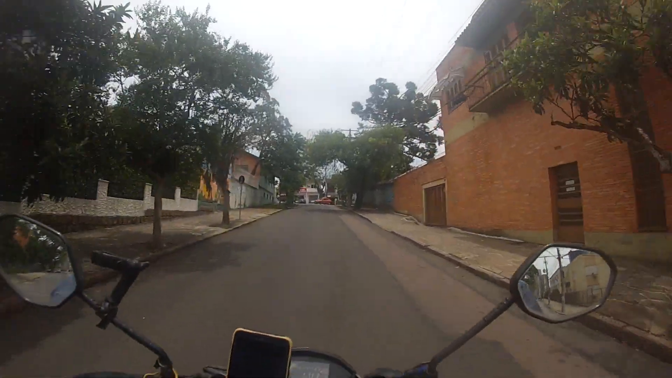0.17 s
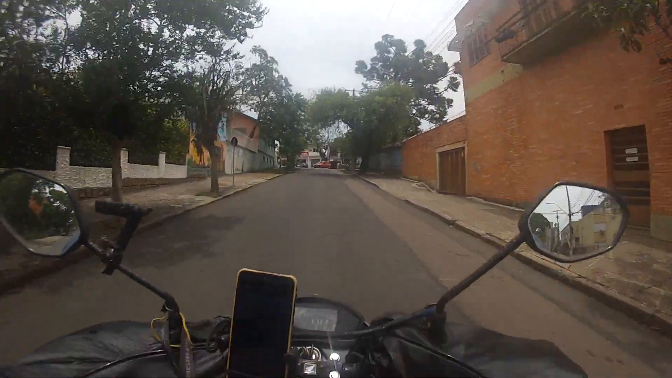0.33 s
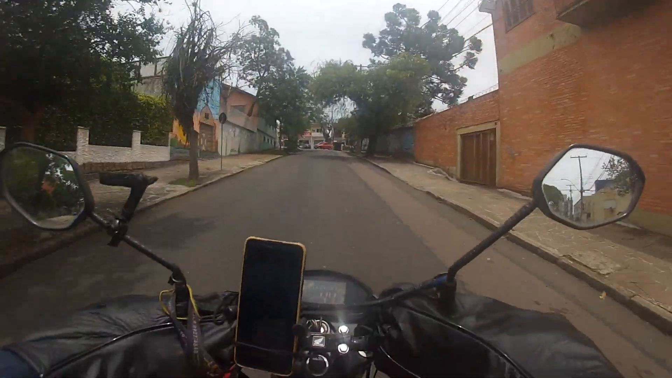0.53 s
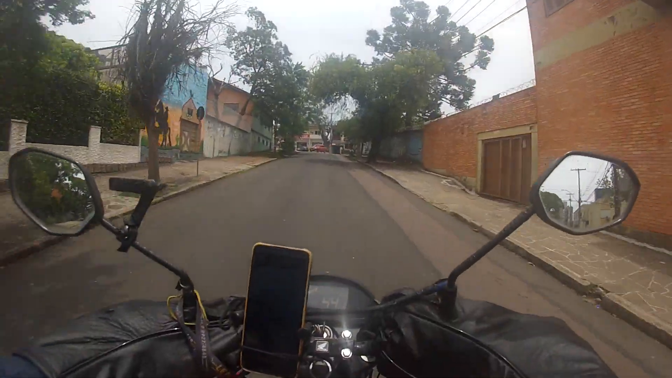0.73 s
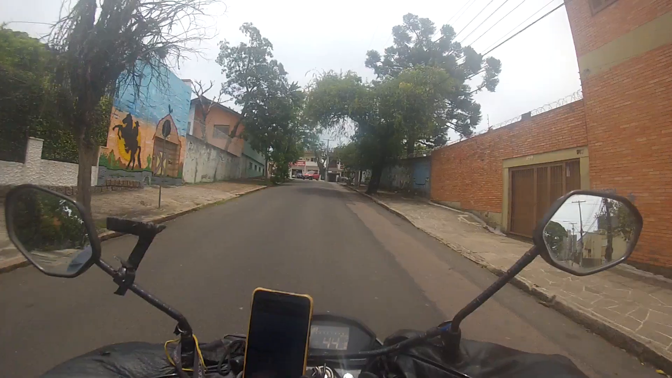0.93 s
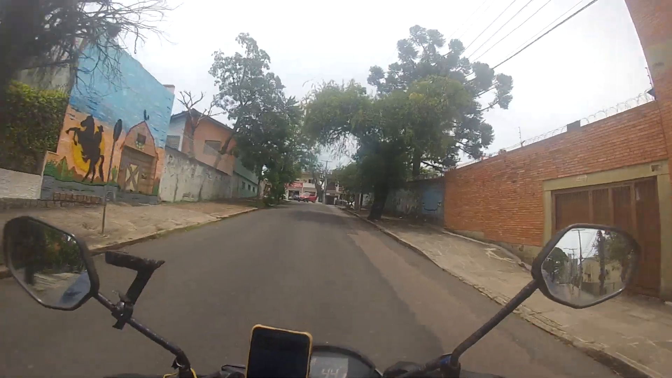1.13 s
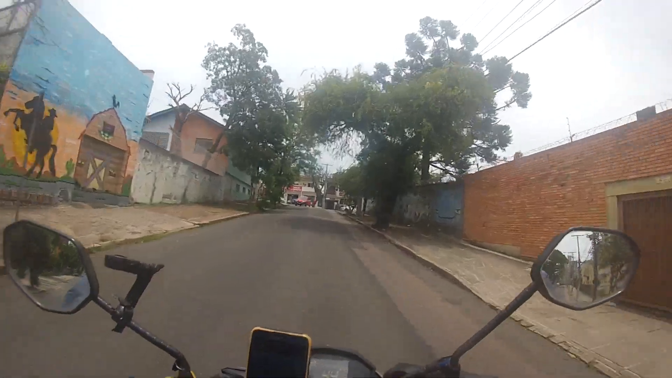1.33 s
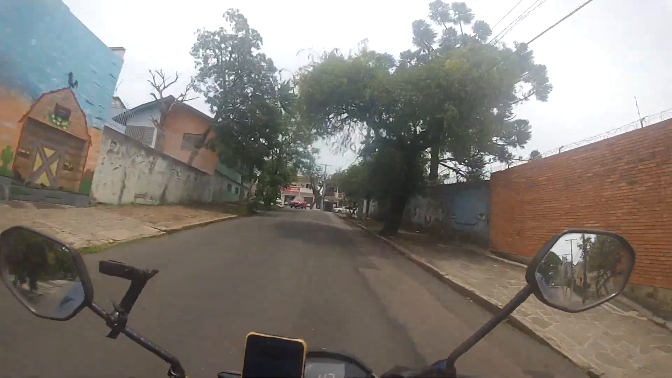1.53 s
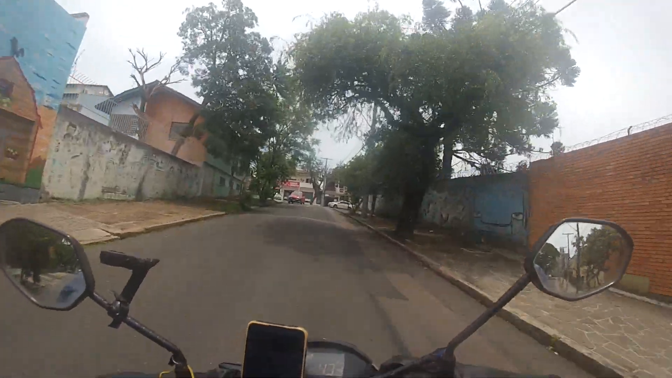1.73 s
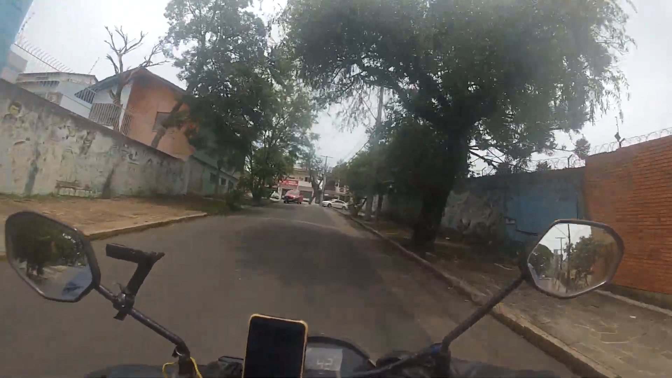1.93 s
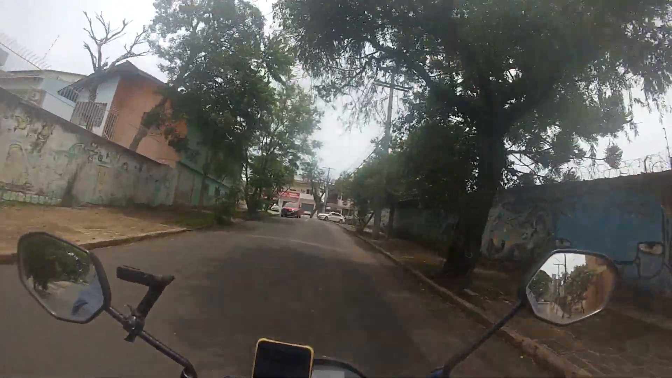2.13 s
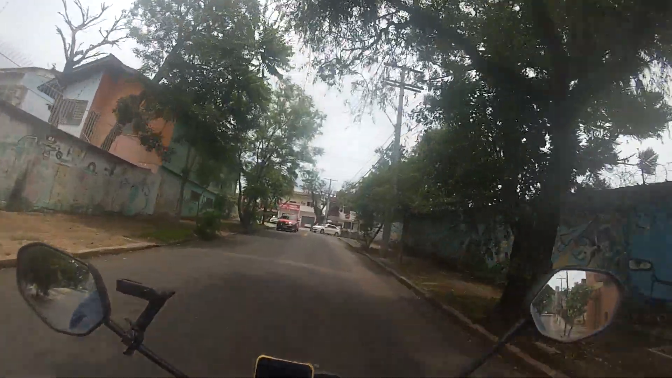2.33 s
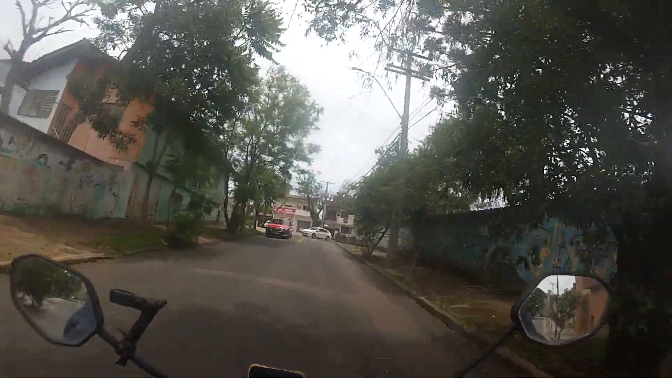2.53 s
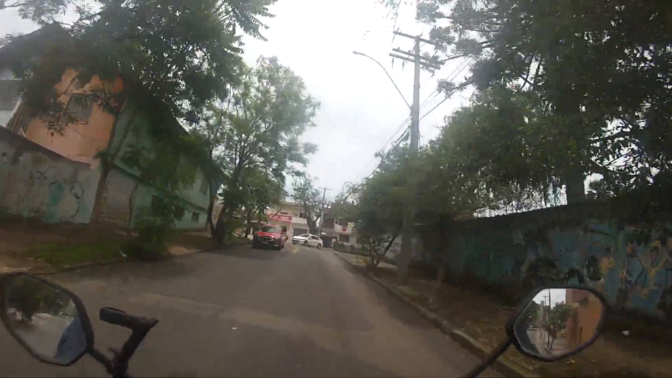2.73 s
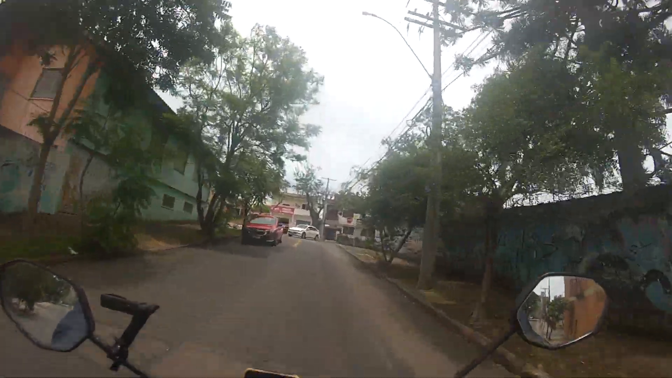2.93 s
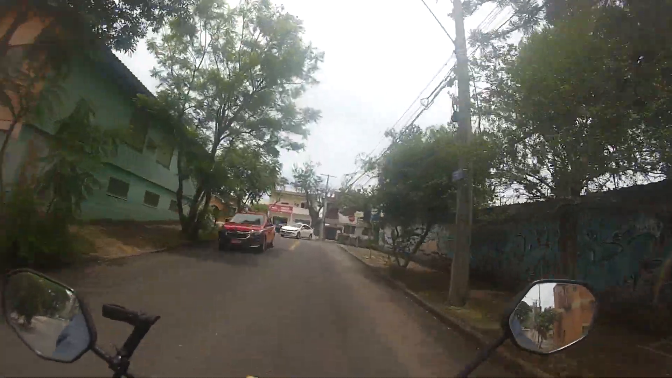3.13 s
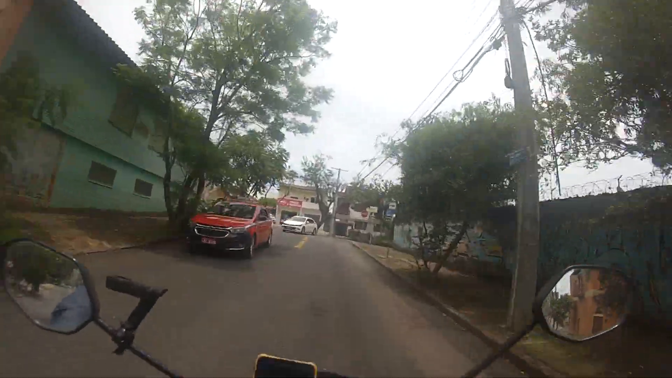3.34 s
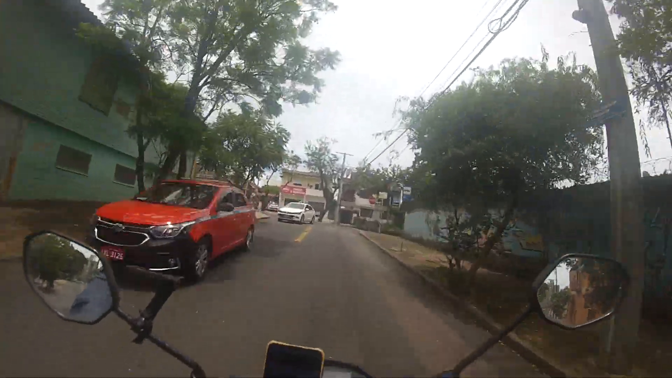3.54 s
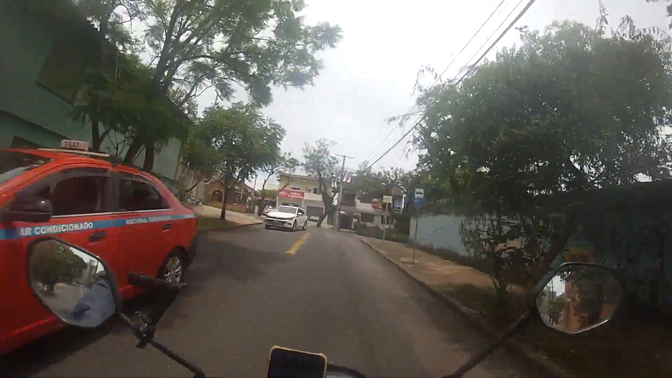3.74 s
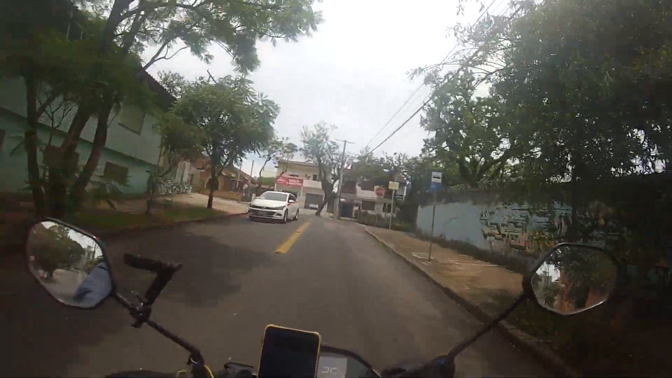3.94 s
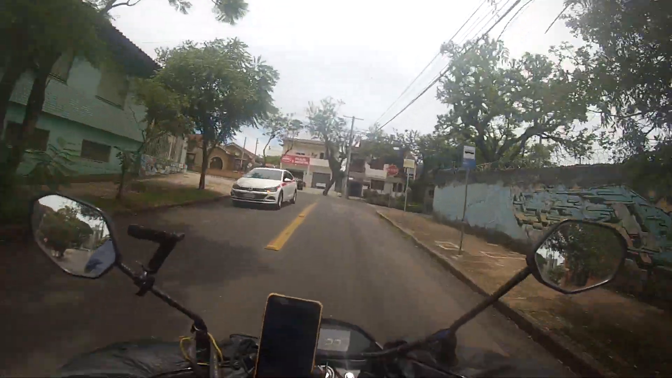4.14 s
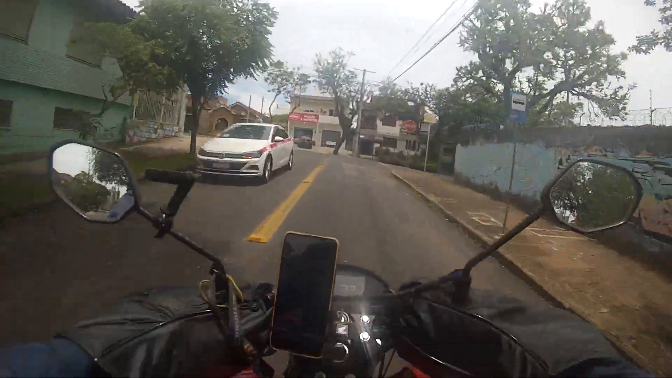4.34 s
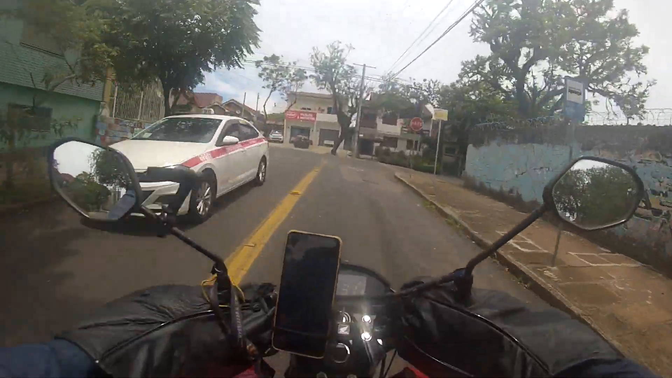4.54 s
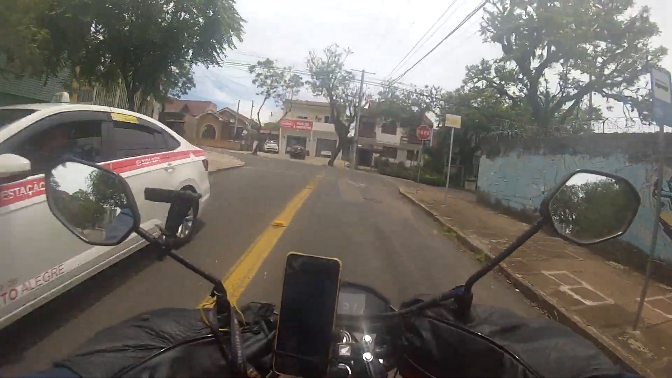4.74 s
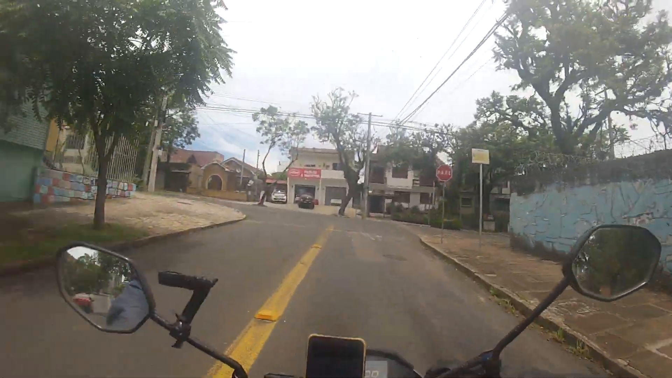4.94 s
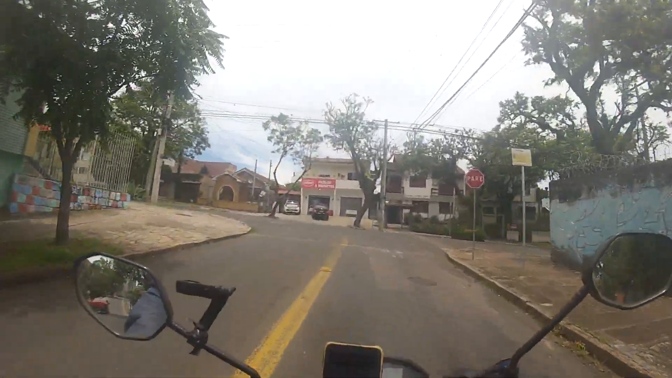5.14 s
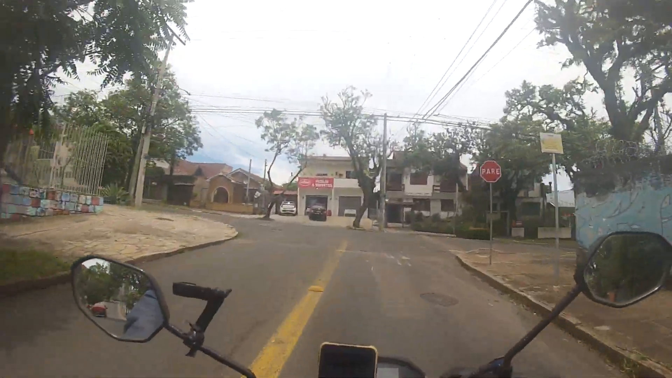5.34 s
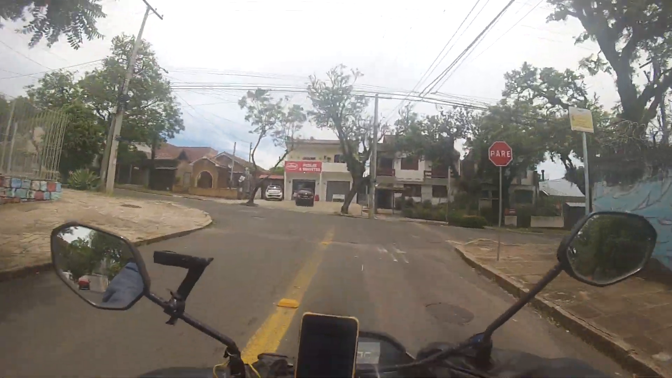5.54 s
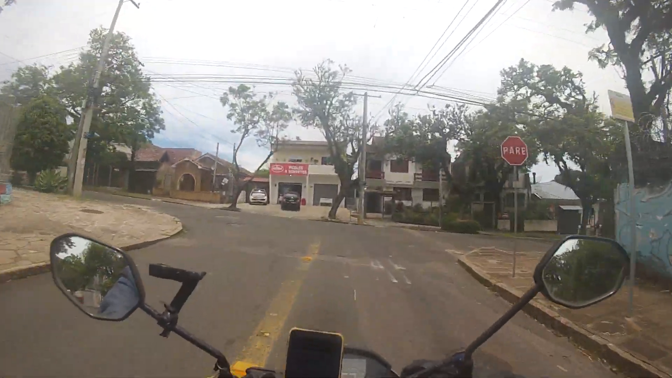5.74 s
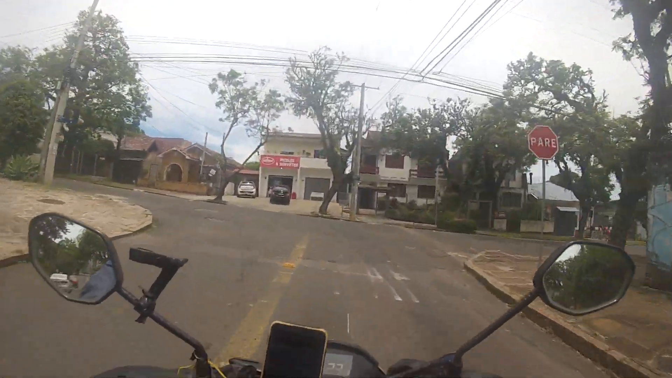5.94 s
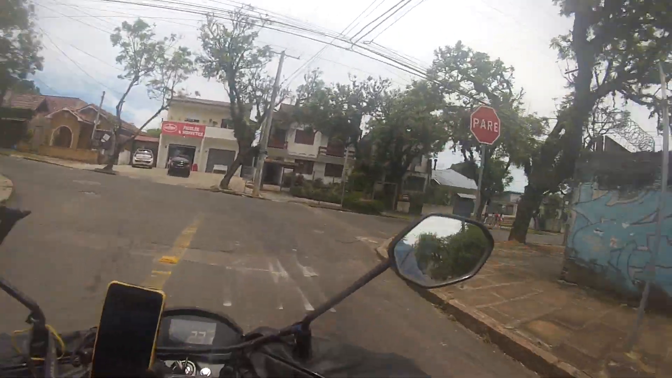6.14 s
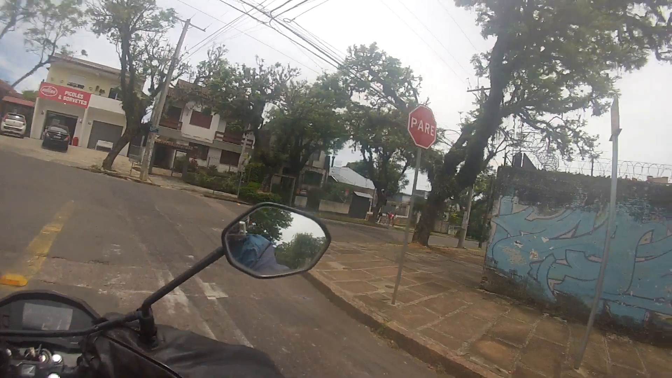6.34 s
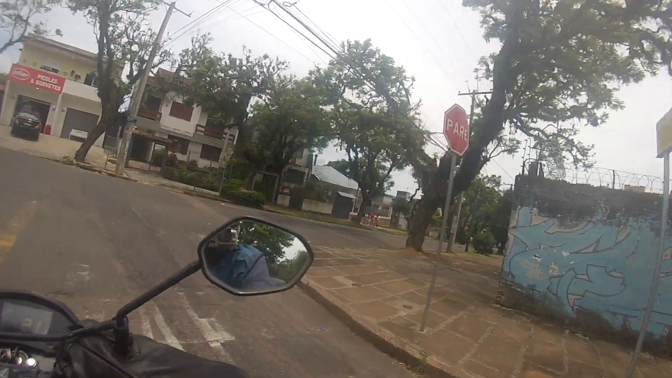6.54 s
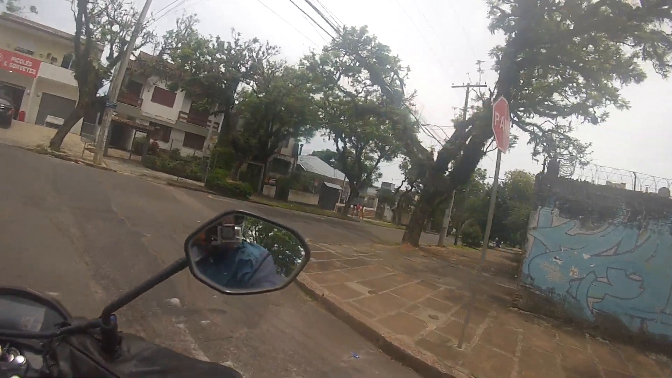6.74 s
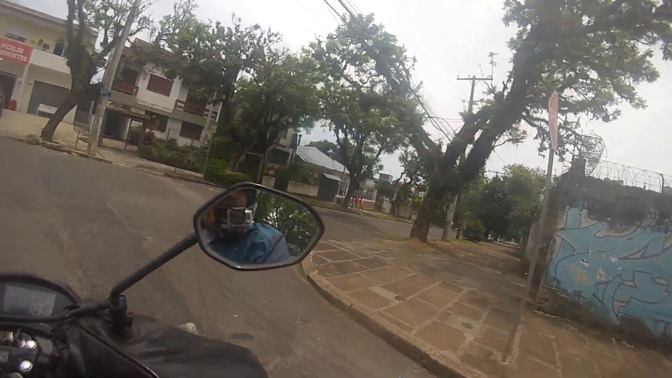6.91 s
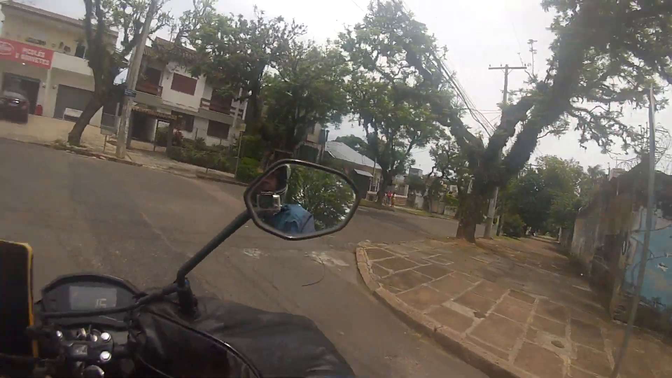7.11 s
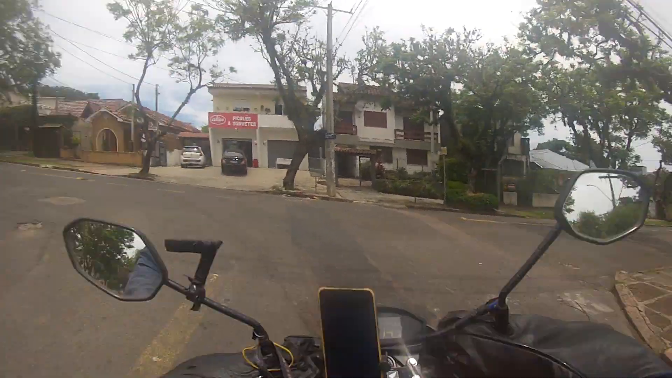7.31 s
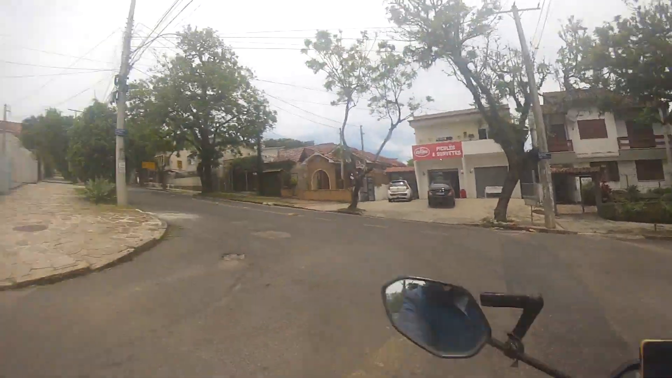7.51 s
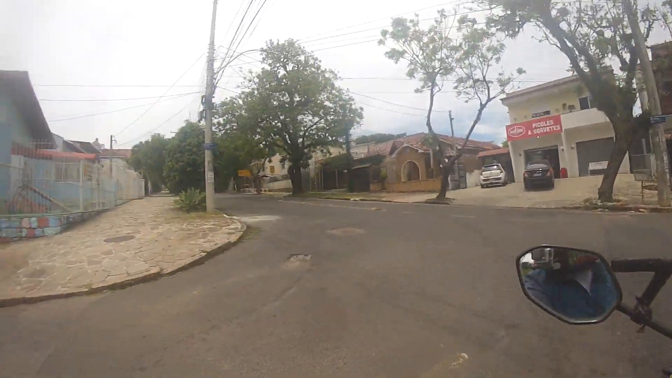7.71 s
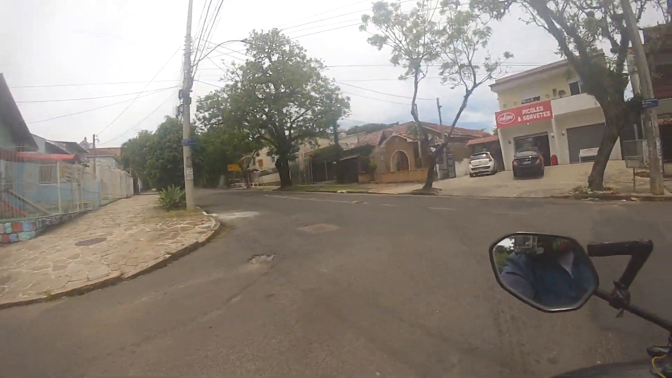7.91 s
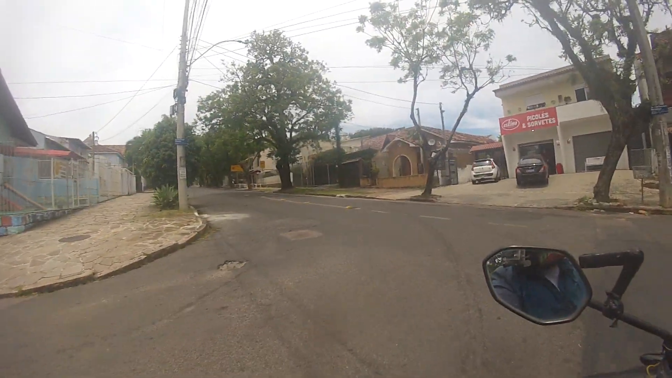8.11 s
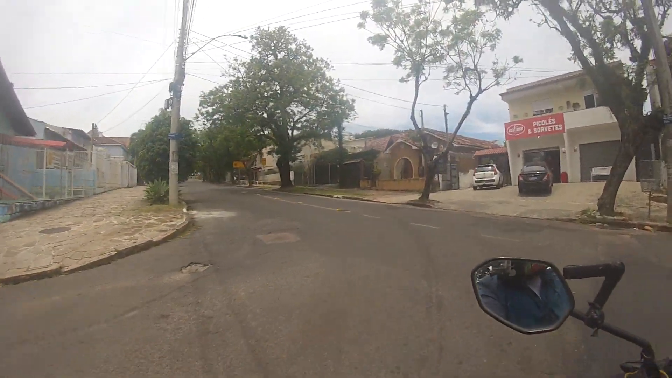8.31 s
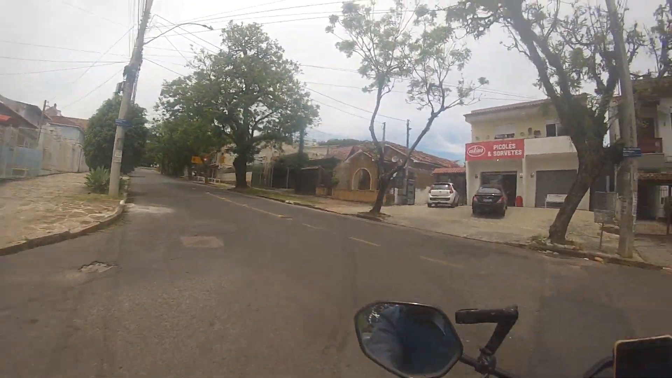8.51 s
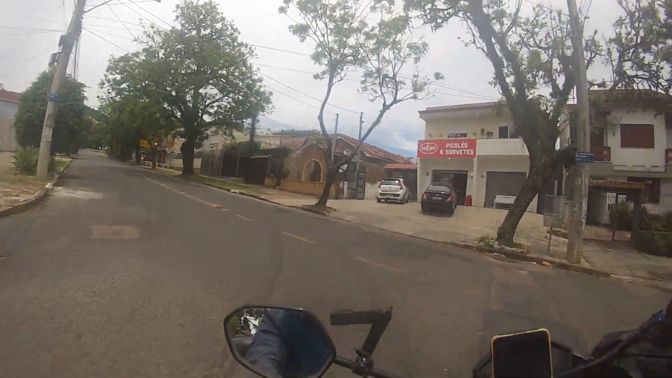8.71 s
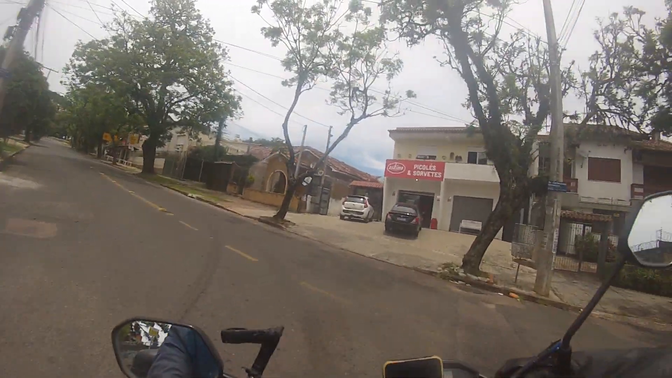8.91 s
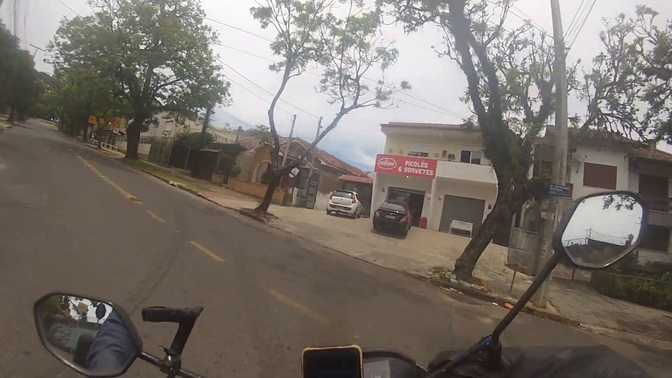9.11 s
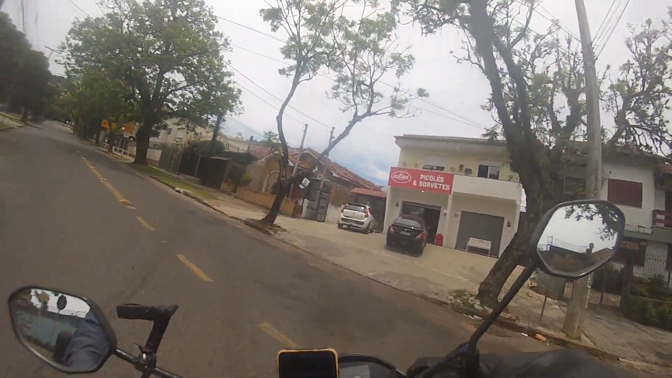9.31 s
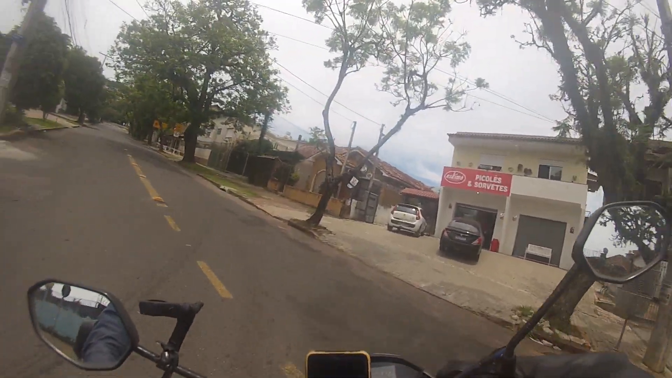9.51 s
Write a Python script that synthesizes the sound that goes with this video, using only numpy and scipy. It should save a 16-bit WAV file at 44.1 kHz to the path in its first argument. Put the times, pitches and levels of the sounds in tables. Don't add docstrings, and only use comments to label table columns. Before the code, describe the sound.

From the start, deep, uneven wind and road rumble presses on a helmet microphone, with boomy thuds, low humming and short visor flutters. Beneath it a small single-cylinder motorcycle engine runs fairly steadily, a muffled rough purr with dry clatter and a brief whine around 0.2 seconds. The engine noise eases after 2 seconds, with light knocks near 2.3. Around 3.3 to 3.55 a hard gust slams the microphone with crackles and small rattles as a car swishes faintly past. Softer passes follow near 4.2 and 4.9. From 5.5 braking lets the wind sink; a few knocks sound and the engine drops by 6 to slow, quiet chugging. At 7.65 a crisp metallic gear clunk bounces briefly. From 8 the engine picks up, low exhaust tone and thin gear whine rising gently to 9.7, over fine hiss and residual low bumps.

```python
import sys
import numpy as np
from scipy import signal
from scipy.fft import rfft, irfft
from scipy.io import wavfile
from scipy.ndimage import uniform_filter1d

SR = 44100
rng = np.random.default_rng(int(sys.argv[2]) if len(sys.argv) > 2 else 0)


def generate_wav(signal):
    frames = np.transpose(np.atleast_2d(signal))
    scaled = np.clip(frames, -1, 1) * 32767
    pcm = np.round(scaled).astype(np.int16)
    wavfile.write(sys.argv[1], SR, pcm)


def amplitude_ratio(level_db):
    exponent = np.asarray(level_db, float) / 20
    return 10 ** exponent


N = 426006

# frequency in Hz, width in Hz, level in dB.
SWAY_MODES = [(17.15, 3.6, 2), (32.3, 5.1, -17.5)]
THUD_MODES = [(56.68, 4.5, -0.5), (46, 8.4, -13), (68.9, 10.6, -11)]
RUMBLE_MODES = [(88.1, 16.2, 6), (103.3, 7, -1.5), (118.6, 10.5, 2), (148.6, 22, -15)]
HUM_MODES = [(180.1, 18, -4.5), (197, 16.7, -5.5), (217.3, 14.2, -0.3), (232, 11.2, -4)]
# frequency in Hz, width in Hz, level in dB.
SEAL_MODES = [(270.7, 16.6, 0.5), (291.7, 12, 0.5), (255, 13, -4)]
# frequency in Hz, width in Hz, level in dB.
ROAR_MODES = [(368, 40, -2), (452.5, 113, 1.5), (591, 130, -5.5), (807, 46, -3.5), (924, 95, -1),
              (1096, 137, 2.4)]
CLATTER_MODES = [(1466, 160, -0.5), (1646, 142, 1), (1956, 230, -1.5), (2252, 275, -3), (2528, 114, -8)]
TICK_MODES = [(3404, 285, 1), (4170, 630, -3.5), (5190, 880, -3), (6180, 240, -8), (7020, 1360, -6),
              (7870, 460, -13.5), (9900, 4500, -12.5)]
# time in seconds, level in dB.
AIRFLOW = [
    (0, 2),
    (.6, -0.5),
    (2, -2.5),
    (4.5, -12),
    (5.3, -12.5),
    (6, -19),
    (6.9, -24),
    (8.2, -22),
    (9.66, -24),
]
# centre in seconds, lift over the lull in dB, length in seconds.
GUSTS = [(0.26, 5, 0.09), (0.68, 9.5, 0.21), (1.19, 8.5, 0.77), (1.86, 5, 0.23), (2.38, 7.5, 0.13),
         (2.69, 4.5, 0.96), (3.4, 19, 0.41), (3.96, 7, 0.16), (4.42, 11, 0.35), (4.62, 13.5, 0.089),
         (4.82, 12, 0.16), (5.3, 5.5, 0.55), (5.83, 19, 0.24), (6.13, 12, 0.23), (6.36, 16, 0.25),
         (7.09, 8.5, 0.21), (7.73, 11.5, 0.15), (8.31, 13, 0.23), (8.67, 9, 0.13), (8.99, 13, 0.068),
         (9.28, 6, 0.11), (9.58, 5.5, 0.31)]
# centre in seconds, lift in dB, length in seconds.
BUMPS = [(0.04, 12, 0.079), (0.2, 13.5, 0.1), (0.38, 13.5, 0.08), (0.59, 11, 0.063), (0.77, 6, 0.05),
         (1.04, 8, 0.26), (1.38, 11.5, 0.18), (1.62, 13.5, 0.17), (1.95, 10.5, 0.13), (2.39, 10, 0.32),
         (2.82, 11.5, 0.11), (2.92, 8.5, 0.067), (3.09, 13, 0.15), (3.51, 13.5, 0.31), (3.97, 12.5, 0.25),
         (4.35, 11.5, 0.36), (4.87, 15, 0.34), (5.46, 7.5, 0.19), (5.74, 15.5, 0.26), (6.14, 5.5, 0.15),
         (6.72, 7.5, 0.22), (7.12, 5, 0.19), (7.46, 7, 0.48), (7.74, 2, 0.091), (8.07, 8.5, 0.046),
         (8.16, 8.5, 0.056), (8.31, 9, 0.23), (9.06, 7, 0.36), (9.41, 8, 0.12), (9.7, 16, 0.06)]
# centre in seconds, lift in dB, length in seconds.
RUTS = [(.02, 10, .09), (.3, 5.5, 0.27), (1.75, 6, .05), (2.29, 2.5, 0.068), (2.49, 9, 0.041),
        (2.78, 7.5, 0.097), (3.16, 4.5, 0.35), (3.45, 4, 0.097), (3.88, 1, 0.049), (4.02, 6, 0.1),
        (4.34, 3.5, 0.082), (4.58, 7, 0.28), (5.88, 10, 0.045), (6.47, 6.5, 0.41), (7.17, 10, 0.12),
        (7.62, 14, 0.23), (8.25, 5.5, 0.47), (8.59, 6.5, .14), (9.64, 9, 0.49)]
# centre in seconds, lift in dB, length in seconds.
EDDIES = [(0.03, 1.5, 0.042), (0.37, 9.5, 0.045), (1.25, 3, 0.5), (1.65, 3, 0.2), (2.14, 4.5, 0.11),
          (2.37, 2.5, 0.28), (2.73, 4.5, 0.1), (2.96, 6, 0.18), (3.17, 5, 0.16), (3.38, 8, 0.19),
          (3.73, 3.5, 0.27), (3.99, 7.5, 0.48), (4.27, 16.5, 0.032), (4.5, 10, 0.32), (4.88, 8, 0.061),
          (5.04, 8, 0.17), (5.18, 6.5, 0.07), (5.48, 9, 0.22), (5.7, 14.5, 0.073), (5.98, 9, 0.48),
          (6.35, 8, 0.08), (6.54, 6.5, 0.4), (7.21, 8, 0.27), (7.59, 9, 0.21), (7.96, 3.5, 0.1),
          (8.11, 3.5, 0.06), (8.65, 6.5, 0.24), (9.59, 7.5, 0.37)]
# centre in seconds, lift in dB, length in seconds.
FLUTTERS = [(.02, 3.5, .12), (.33, 2, .15), (.7, 5.5, .15), (1.16, 11, .07), (1.32, 8, .16),
            (1.58, 8.5, .08), (1.8, 5, 0.15), (2.02, 8.5, 0.27), (2.3, 3, .2), (2.6, 7, 0.14),
            (2.85, 4, .1), (3.17, 6, .1), (3.68, 8, 0.065), (3.82, 11, 0.065), (4.05, 8.5, 0.14),
            (4.22, 9, .12), (4.42, 9, .12), (4.71, 10, .08), (4.95, 4, 0.13), (5.15, 3, .15), (5.5, 0, .15),
            (5.95, 6, .2), (6.4, 4, .2), (6.83, 10.5, .1), (7.66, 7, .08), (8.1, 3, .2), (8.6, 3, .2),
            (9.47, 9, 0.3)]
# centre in seconds, lift in dB, length in seconds.
SPILLS = [(.1, 8, .2), (.35, 11, .2), (.6, 14, 0.19), (.95, 13, 0.33), (1.5, 8, .3), (2.4, 8, .15),
          (2.95, 5, 0.18), (3.4, 7, .3), (3.75, 7, .15), (4.35, -3, .2), (4.7, 10, 0.3), (5.4, -1, .2),
          (6.5, 10, .15), (7.65, 8, 0.27), (8.2, 3.5, .3), (8.7, 5, .2)]
# time in seconds, speed in turns per second.
CRANK_SPEED = [(0, 50.5), (1.0, 49.5), (2.0, 48.5), (4.0, 49), (5.6, 49), (6.0, 25), (7.3, 23.5),
               (7.75, 25), (8.0, 41), (8.4, 42), (8.8, 45.6), (9.1, 48.3), (9.35, 50.3), (9.66, 54.5)]
# time in seconds, share of noise gated by the strokes (0-1), exhaust tone in dB.
LOAD = [(0, .22, -48), (2.0, .22, -50), (2.3, .15, -58), (5.6, .18, -60), (6.1, .35, -58), (7.6, .25, -52),
        (8.0, .25, -42), (8.4, .3, -39), (8.8, .33, -40), (9.4, .33, -39.5), (9.66, .35, -43)]
# time in seconds, level in dB.
EFFORT = [(0, -45), (.4, -45), (.73, -46.5), (1.4, -46), (1.95, -48.5), (2.5, -54.5), (3.0, -54),
          (3.9, -53), (4.52, -55.5), (4.9, -54), (5.3, -56), (7.24, -59.5), (7.64, -53.5), (7.92, -58.5),
          (8.07, -53), (8.3, -54), (9.45, -51), (9.66, -46.5)]
# time in seconds, excess in dB.
FIRING = [
    (0, 7),
    (5.6, 7),
    (6.1, 5),
    (8.3, 5),
    (8.6, 2),
    (9.0, 2),
    (9.25, 5),
    (9.66, 4),
]
# multiple of the crank speed, level in dB.
EXHAUST_ORDERS = [(.5, -9), (1, 0), (1.5, -13), (2, -18), (2.5, -15), (3, -28), (3.5, -22), (4, -29),
                  (4.5, -27), (5, -26)]
# frequency in Hz, level in dB, decay time t60 in seconds.
VALVE_MODES = [(3520, 0, .05), (3410, -3, .04)]
# start in seconds, length in seconds, from Hz, to Hz, top in dB.
WHINE = [(.16, .2, 1600, 1685, -39), (.49, .09, 1630, 1550, -46), (8.05, .17, 1520, 1690, -51),
         (8.46, 1.08, 1480, 1700, -49), (7.86, .17, 2200, 2560, -59), (8.33, .36, 2400, 2600, -58),
         (8.95, .6, 3370, 3500, -60), (9.42, .3, 1990, 2050, -53), (8.4, .97, 3080, 3090, -67),
         (.35, .055, 1620, 1570, -43), (3.62, .25, 1500, 1530, -54), (3.24, .045, 1600, 1650, -51),
         (7.9, 1.4, 4300, 4330, -71), (8.58, .6, 1650, 1700, -53), (2.17, .17, 3480, 3420, -59),
         (2.01, .025, 4650, 4750, -57), (.46, .06, 1470, 1460, -46), (8.2, .14, 1600, 1540, -52),
         (6.74, .26, 1560, 1520, -58), (7.54, .05, 1680, 1690, -54), (9.05, .45, 1640, 1610, -53)]
# rate of wavering in Hz, steady share (0-1).
WHINE_BREADTH = [(38, .9), (40, .85), (50, .85), (55, .9), (140, .4), (85, .55), (110, .3), (120, .1),
                 (60, .2), (50, .8), (70, .5), (90, .5), (120, .1), (70, .85), (80, .5), (60, .6), (40, .6),
                 (60, .8), (90, .5), (35, .9), (70, .8)]
# frequency in Hz, density in dB per Hz.
HISS_SPECTRUM = [(250, 5), (400, -8), (700, -3), (1500, -7.5), (2500, -10.5), (2900, -10.5), (4000, -16),
                 (8000, -20), (12000, -23.5), (15500, -26.5)]
# time in seconds, peak in dB, loudest frequency in Hz, t60 in seconds.
KNOCKS = [(2.340, -30, 880, .028), (2.465, -38, 920, .035), (3.232, -41, 1150, .03),
          (3.272, -40, 2380, .02), (3.291, -38, 1120, .045), (3.318, -43, 2250, .02),
          (3.402, -40, 2120, .025), (3.418, -41, 1250, .025), (3.445, -40, 1200, .02),
          (3.4995, -40, 1800, .015), (3.515, -40, 2200, .015), (3.5424, -39, 1420, .025),
          (3.543, -40, 1130, .03), (3.292, -41, 1500, .03), (3.404, -42, 1600, .02),
          (4.510, -48, 1520, .03), (4.655, -43, 790, .035), (5.546, -45, 1120, .035),
          (5.746, -41, 1150, .035), (5.872, -36, 1100, .035), (6.026, -47, 1080, .03),
          (6.365, -43, 1550, .035), (7.483, -47, 1500, .03), (7.509, -36, 1100, .035),
          (6.861, -48, 1500, .02), (6.931, -46, 1480, .02)]
# passing time in seconds, level in dB, length in seconds.
PASSING_CARS = [
    (3.3, -58, 0.45),
    (4.2, -57, 0.97),
    (4.895, -55.5, 0.37),
    (6.386, -58, .25),
]
# start in seconds, level in dB, length in seconds, depth of push.
CRACKLE = [(3.305, -61, .003, .22), (3.375, -70, .003, .22), (3.4445, -51, .007, .3),
           (3.476, -59, .0015, 0), (3.486, -58, .001, 0), (3.4995, -49, .003, .28), (3.515, -57, .002, 0),
           (3.556, -70, .002, .15), (6.368, -66, .004, 0), (6.861, -62, .005, 0), (6.931, -61, .004, 0)]
# time in seconds, peak in dB, contact frequency in Hz.
CLUNK = [
    (7.6488, -17, 2400),
    (7.6625, -28, 900),
    (7.668, -25.5, 700),
]
# frequency in Hz, level in dB, decay time t60 in seconds.
GEARBOX_MODES = [(550, 5.5, 0.04), (815, -3.5, 0.13), (980, -1, 0.061), (1240, 5, 0.017), (1440, 3, 0.046),
                 (1683, -11, .04), (2240, -10, .05), (2650, -10.5, 0.07)]


def rms_one(x):
    return x / np.sqrt(np.mean(x ** 2) + 1e-20)


def in_time(rows):
    seconds, *columns = np.transpose(rows)
    return [np.interp(np.arange(N) / SR, seconds, column) for column in columns]


def bell(t, centre, length):
    return np.exp(-(2 * (t - centre) / length) ** 2)


def drift(rate):
    r = np.exp(-80 * np.pi * rate / SR)
    white = rng.standard_normal(N // 40 + 2002)
    slow = signal.lfilter([1], [1, -2 * r, r * r], white)[2000:]
    return np.interp(np.arange(N) / 40, np.arange(len(slow)), rms_one(slow))


def resonate(x, hz, width):
    r = np.exp(-np.pi * width / SR)
    poles = [1, -2 * r * np.cos(2 * np.pi * hz / SR), r * r]
    return signal.lfilter([(1 - r * r) / 2, 0, (r * r - 1) / 2], poles, x)


def ring(clicks, hz, t60):
    r, w = amplitude_ratio(-60 / (t60 * SR)), 2 * np.pi * hz / SR
    return signal.lfilter([0, np.sin(w)], [1, -2 * r * np.cos(w), r * r], clicks + 1e-18)


def shaken(modes, patchy_db, rate, even=0.0):
    out, pool = 0, rng.standard_normal(N + SR // 2)
    for hz, width, level_db in modes:
        white = np.roll(pool, int(rng.integers(N)))
        once = resonate(white, hz, 1.56 * width)
        tone = resonate(once, hz, 1.56 * width)[SR // 2:]
        out = out + amplitude_ratio(level_db + patchy_db * drift(rate)) * rms_one(tone)
    out = rms_one(out)
    loudness = uniform_filter1d(uniform_filter1d(out ** 2, size=4000), size=4000)
    return rms_one(out / (loudness + 0.023) ** (even / 2))


def swells(events, lull_db, follows):
    t = np.arange(0, N + 64, 64) / SR
    lift = 1 + sum((amplitude_ratio(db) - 1) * bell(t, s, length) for s, db, length in events)
    lull = amplitude_ratio(lull_db + follows * in_time(AIRFLOW)[0])
    return lull * np.interp(np.arange(N) / SR, t, lift)


def mount():
    sway = swells(GUSTS, lull_db=-31, follows=0.53) * shaken(SWAY_MODES, 0.97, 1.5, even=1.0)
    pinned_s, pinned_length_s, pinned_share = 3.43, .34, .75
    since = np.arange(N) / SR - pinned_s
    sway *= 1 - pinned_share * np.exp(-(2 * since / pinned_length_s) ** 4)
    thud = swells(BUMPS, lull_db=-31.5, follows=0.73) * shaken(THUD_MODES, 0.9, 0.62, even=1.0)
    rumble = swells(RUTS, lull_db=-32.5, follows=1) * shaken(RUMBLE_MODES, 0.29, 12.0, even=0.72)
    hum = swells(EDDIES, lull_db=-33.5, follows=1.16) * shaken(HUM_MODES, 0.63, 1.4, even=0.76)
    return sway + thud + rumble + hum


def engine():
    clatter_db, = in_time(EFFORT)
    eased_db = clatter_db + 46
    roar_db = -47 + .7 * eased_db + 0.27 * in_time(AIRFLOW)[0]
    tick_db = -57.5 + 1.115 * eased_db
    share, tone_db = in_time(LOAD)
    turns = np.cumsum(in_time(CRANK_SPEED)[0] * (1 + .008 * drift(6))) / SR
    turn = turns.astype(int)
    firing_db = in_time(FIRING)[0] * (.5 - turn % 2)
    strength = amplitude_ratio(1.5 * rng.standard_normal(600)[turn] + firing_db)
    stroke = rms_one(uniform_filter1d(strength * np.exp(-2.5 * (turns % 1)), size=260))
    gate = 1 - share + share * stroke
    roar = amplitude_ratio(roar_db) * rms_one(shaken(ROAR_MODES, 0.91, 2.2, even=.6) * gate ** 0.72)
    clatter = amplitude_ratio(clatter_db) * rms_one(shaken(CLATTER_MODES, 0.42, 2.2, even=.6) * gate)
    tick = amplitude_ratio(tick_db) * rms_one(shaken(TICK_MODES, 1.3, 5.0) * gate)
    exhaust = np.zeros(N)
    for order, db in EXHAUST_ORDERS:
        exhaust += amplitude_ratio(db + 2.5 * drift(8)) * np.sin(2 * np.pi * (order * turns + rng.random()))
    gears = whine() * rms_one(gate ** 1.7)
    return roar + clatter + tick + amplitude_ratio(tone_db) * exhaust + gears + valves(turns, eased_db)


def valves(turns, eased_db):
    seats = np.flatnonzero(np.diff((turns / 2).astype(int)))
    out, spread = 0, rng.standard_normal((400, 2))
    for k, (hz, level_db, t60) in enumerate(VALVE_MODES):
        clicks = np.zeros(N)
        clicks[seats] = amplitude_ratio(level_db + 1.3 * spread[:len(seats), k])
        out = out + ring(clicks, hz, t60)
    return amplitude_ratio(-54 + 1.115 * eased_db) * resonate(out, 3470, 260)


def hiss():
    hz = np.maximum(np.arange(N // 2 + 1) * SR / N, 1)
    table_hz, table_db = np.transpose(HISS_SPECTRUM)
    shape = amplitude_ratio(np.interp(np.log(hz), np.log(table_hz), table_db)) * (hz > 250)
    noise = rfft(rng.standard_normal(N)) * shape
    treble = irfft(noise * (hz > 2800), N)
    return amplitude_ratio(-65.5) * irfft(noise, N) / np.std(treble)


def chin_wash():
    wash_modes = [(155, 35, 0), (320, 40, -14)]   # Hz, width in Hz, dB
    return swells(SPILLS, lull_db=-52, follows=0.39) * shaken(wash_modes, 1.0, 3.5, even=.6)


def seal():
    return swells(FLUTTERS, lull_db=-46.5, follows=0.82) * shaken(SEAL_MODES, 0.8, 2.7, even=0.81)


def whine():
    out = np.zeros(N + SR)
    shape_at = [0, 0.8, 1]
    for (s, length, from_hz, to_hz, top_db), (rate, steady) in zip(WHINE, WHINE_BREADTH):
        along = np.linspace(0, 1, int(length * SR))
        start = int(s * SR)
        on = (start + np.arange(len(along))).clip(0, N - 1)
        rough = (steady + drift(rate) + 1j * drift(rate))[on]
        rough = rough / (abs(rough) + .1) ** steady
        level = amplitude_ratio(np.interp(along, shape_at, [top_db - 2, top_db, top_db - 6]))
        glide = np.interp(along, shape_at, [0, 1, 1 - 0.326])
        hz = from_hz + (to_hz - from_hz) * glide
        turning = np.exp(2j * np.pi * np.cumsum(hz) / SR)
        fade = signal.windows.tukey(len(on), .15)
        out[start:][:len(on)] += fade * level * (rough * turning).real
    return out[:N]


def treble_fizz():
    since = (np.arange(N) / SR - .545 + .5) % 1 - .5
    bright = signal.butter(2, 9500, "high", fs=SR, output="sos")
    fizz = signal.sosfilt(bright, rng.standard_normal(N))
    return amplitude_ratio(-69) * fizz * bell(since, 0, .05)


def knocks():
    out = np.zeros(N)
    soft_contact = signal.butter(3, 2400, fs=SR, output="sos")
    for s, peak_db, hz, t60 in KNOCKS:
        rattle = np.zeros(SR // 4)
        rattle[:200] = amplitude_ratio(peak_db - 28) * rng.standard_normal(200) * np.exp(-np.arange(200) / 60)
        rattle[0] = amplitude_ratio(peak_db - 2)
        rattle = signal.sosfilt(soft_contact, rattle)
        shell = sum(ring(rattle, mode_hz, 0.022) for mode_hz in (480, 1430, 1680, 2340))
        out[round(s * SR):][:len(rattle)] += ring(rattle, hz, t60) + .38 * shell
    return out


def passing_cars():
    t = np.arange(N) / SR
    level = sum(amplitude_ratio(db) * bell(t, s, length) for s, db, length in PASSING_CARS)
    return level * shaken(ROAR_MODES, 0.85, 5.0)


def crackle():
    level, push, t = np.zeros(N), np.zeros(N), np.arange(N) / SR
    for s, level_db, length, depth in CRACKLE:
        level += amplitude_ratio(level_db) * ((t > s) & (t < s + length))
        phase = (t - s - length / 2) / .011
        push -= depth * (1 - phase ** 2) * np.exp(-phase ** 2 / 2)
    bursts = level * rng.standard_normal(N) + 1e-18
    bright = signal.butter(1, [1200, 14000], "band", fs=SR, output="sos")
    cavity = 2 * resonate(bursts, 3850, 600)
    return push + signal.sosfilt(bright, bursts) + cavity


def gear_clunk():
    out = np.zeros(N)
    for s, peak_db, contact_hz in CLUNK:
        click = np.zeros(SR // 2)
        click[0] = amplitude_ratio(peak_db - 20)
        body = 3.4 * ring(click, 1110, 0.017)
        for hz, db, t60 in GEARBOX_MODES:
            body += amplitude_ratio(db + 1.5 * rng.standard_normal()) * ring(click, hz, t60)
        soft_contact = signal.butter(3, contact_hz, fs=SR, output="sos")
        out[round(s * SR):][:len(body)] += signal.sosfilt(soft_contact, body)
    return out


def scene():
    wind_and_road = mount() + chin_wash() + seal()
    machine = engine() + knocks() + gear_clunk()
    faint_and_sharp = hiss() + treble_fizz() + crackle()
    return (wind_and_road + machine + passing_cars() + faint_and_sharp)[None]


def low_pass(x):
    return signal.sosfilt(signal.butter(12, 15290, fs=SR, output="sos"), x)


def record(dry):
    rounded = 0.78 * np.tanh(dry / 0.82)
    return low_pass(rounded)


dry = scene()
out = record(dry)
generate_wav(out)
```